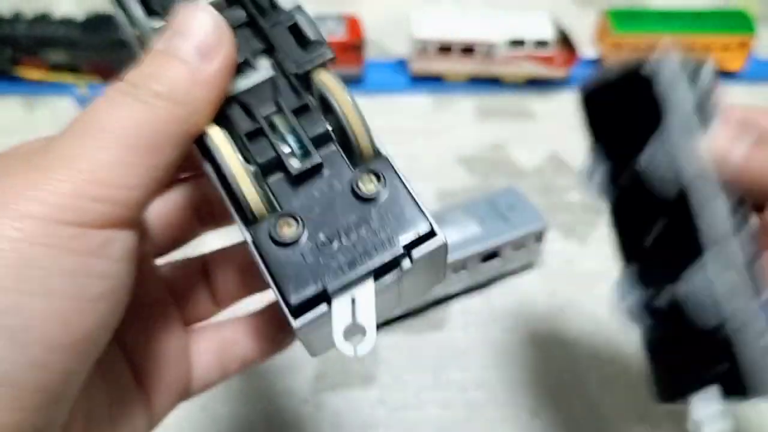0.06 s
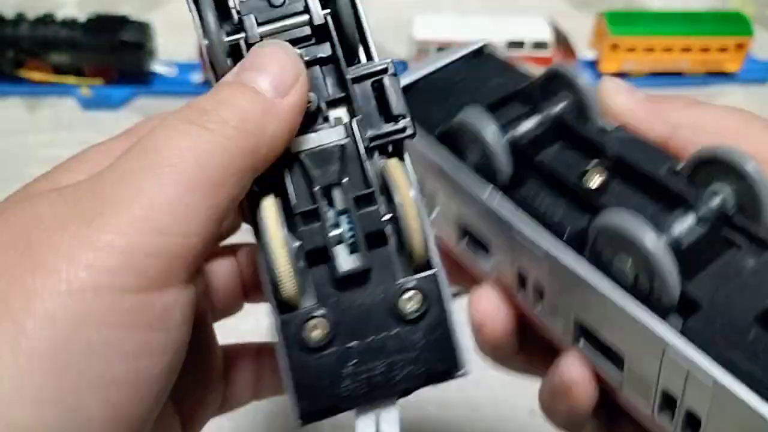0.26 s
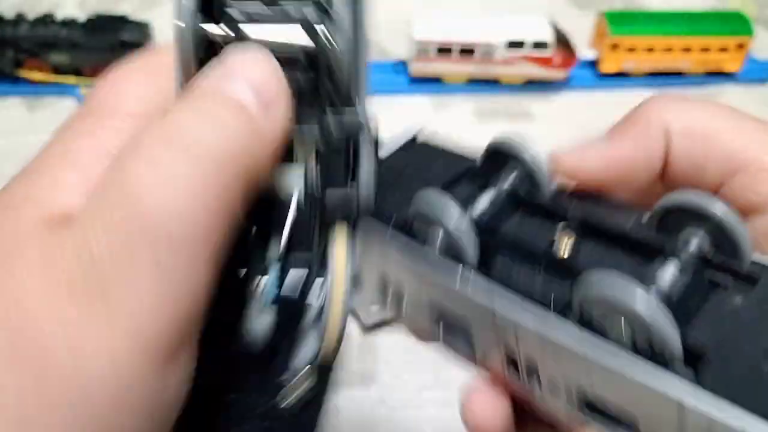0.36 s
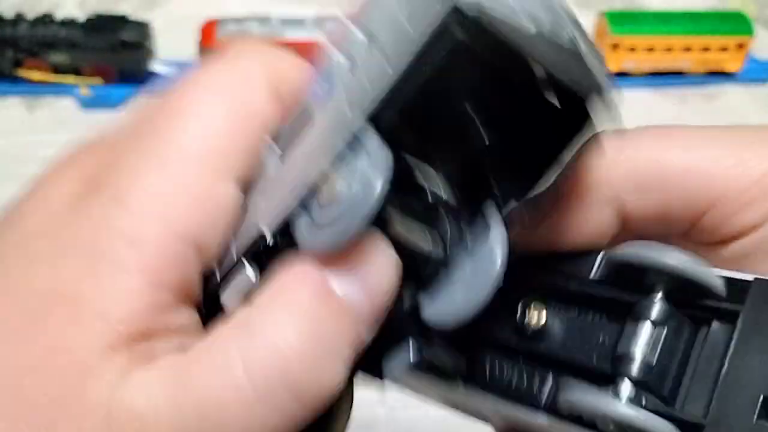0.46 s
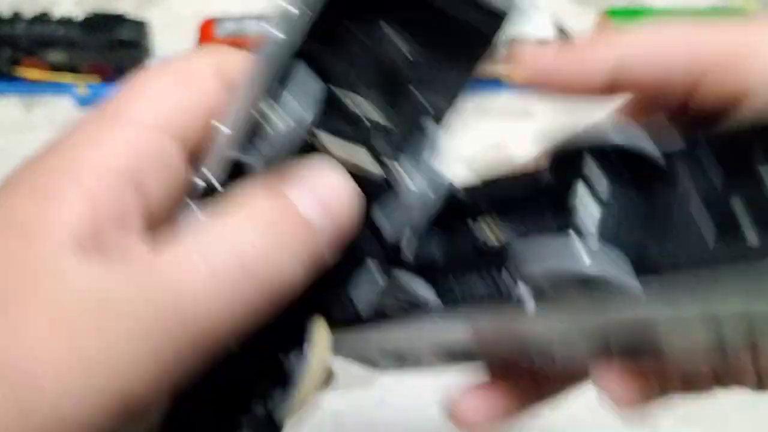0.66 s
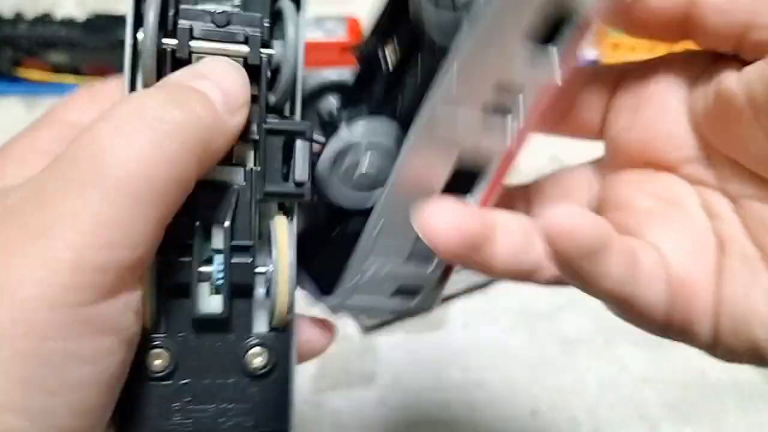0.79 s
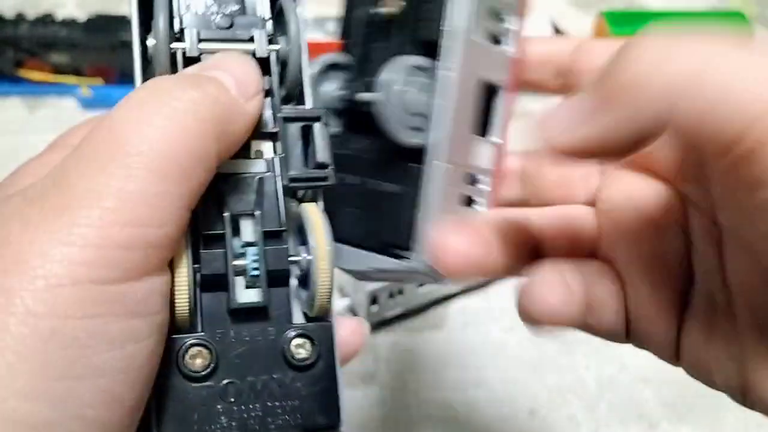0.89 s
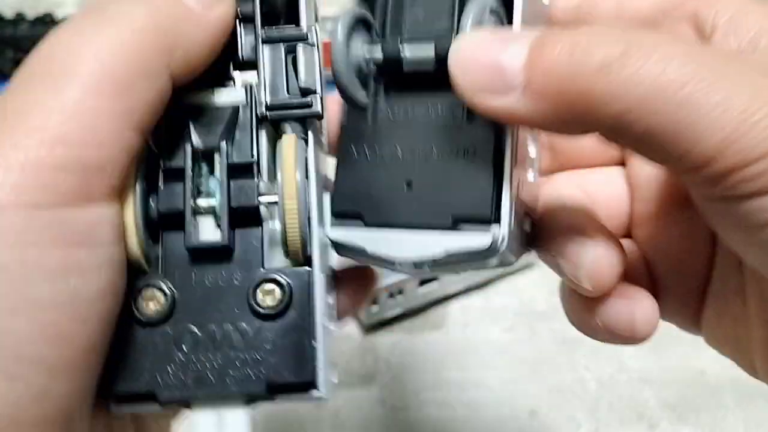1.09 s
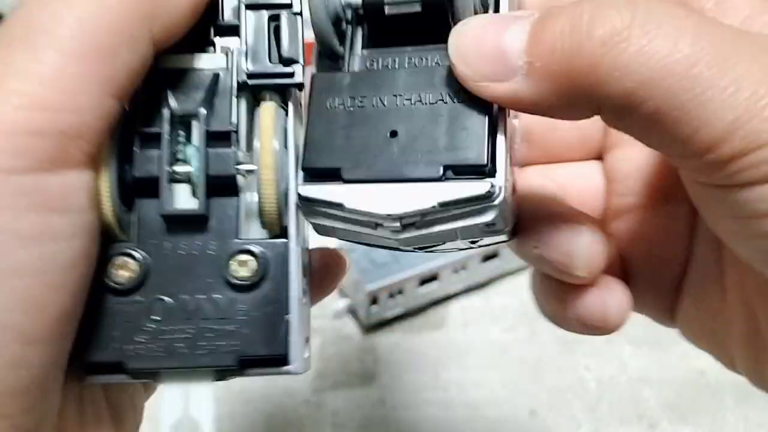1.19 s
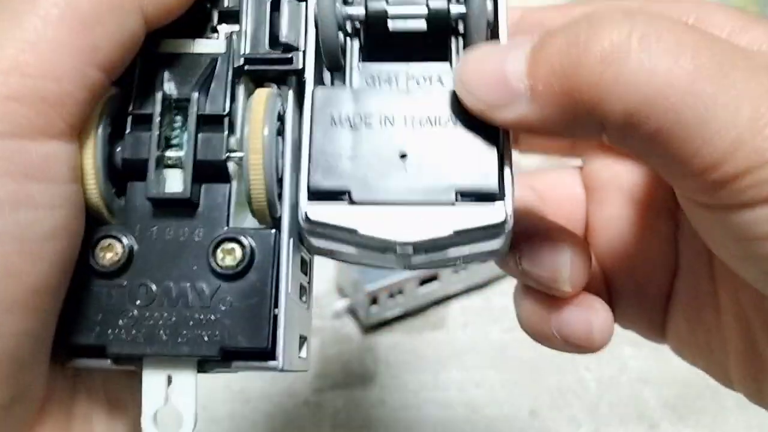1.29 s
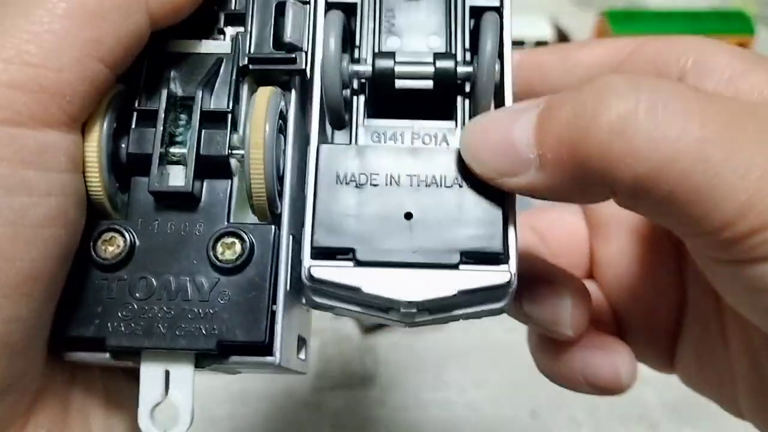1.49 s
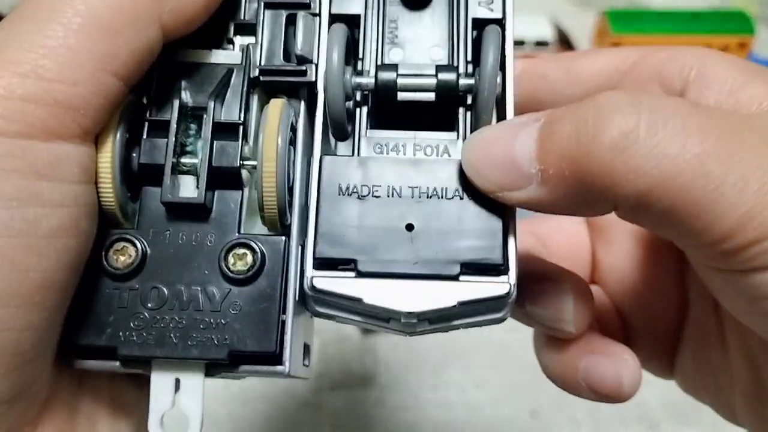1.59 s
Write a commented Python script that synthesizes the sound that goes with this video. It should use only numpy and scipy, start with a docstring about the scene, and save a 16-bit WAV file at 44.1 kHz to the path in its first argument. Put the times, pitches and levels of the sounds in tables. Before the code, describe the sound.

Close, hollow clicks and rattles of two plastic toy train cars turned in the hands.

```python
"""In a quiet room, close by, two plastic toy train cars are turned in the hands and knocked together.
Shells, loose wheels and axles click and rattle: each impact excites the normal modes of the same
hollow bodies, and the point of contact decides which are favoured. Between the clicks, friction of
fingers on plastic gives a faint rubbing. A low hum lies underneath, and all fades at the very end."""
import sys
import numpy as np
from scipy import signal
from scipy.fft import rfft, irfft
from scipy.io import wavfile

SR = 44100
rng = np.random.default_rng(int(sys.argv[2]) if len(sys.argv) > 2 else 0)


def generate_wav(signal):
    """Clip the signal to [-1, 1] and save it as 16-bit WAV at the path in sys.argv[1]."""
    frames = np.transpose(np.atleast_2d(signal))
    scaled = np.clip(frames, -1, 1) * 32767
    pcm = np.round(scaled).astype(np.int16)
    wavfile.write(sys.argv[1], SR, pcm)


N = 72765

# spectrum of the still air: f/Hz, relative spectral level/dB
AIR_SPECTRUM = [(25, -17.5), (70, -3), (130, 5), (250, -4), (500, -7.5), (1000, 0), (2500, -15),
                (6000, -20), (15000, -32.5)]
# faint low tones: peak t/s, 1/e half-width/s, f/Hz, level/dB
LOW_TONES = [(1.033, 0.029, 278, -54), (1.424, 0.025, 178, -60.5)]
# envelope of the rubbing: t/s, level/dB
RUB_ENVELOPE = [(0, -45), (.05, -50.5), (.14, -52.5), (.21, -48.5), (.28, -51), (.37, -52), (.46, -46.5),
                (.56, -49.5), (.61, -38), (.64, -54), (.70, -44), (.79, -48), (.87, -43), (.95, -50.5),
                (.99, -54.5), (1.05, -54), (1.08, -41.5), (1.12, -47.5), (1.165, -37.5), (1.19, -34),
                (1.245, -39.5), (1.285, -65), (1.33, -54.5), (1.39, -50.5), (1.45, -59), (1.48, -55),
                (1.555, -60.5), (1.61, -84)]
# spectrum of the slips: f/Hz, relative spectral level/dB
SLIP_SPECTRUM = [(200, -14.5), (500, -26.5), (800, -20), (1100, -10.5), (1400, -6), (1750, -14.5),
                 (2500, 4), (3100, -14.5), (3700, -8), (5200, -18), (7000, -19), (8000, -31), (12000, -32),
                 (15000, -42)]
# normal modes of the shells: f/Hz, level/dB, T60/s
SHELL_MODES = [(379, -37.5, 0.037), (721, -23.5, 0.05), (893, -21, 0.035), (1036, -22, .035),
               (1431, -12.5, 0.081), (1636, -10, 0.061), (1888, -4.5, 0.031), (2018, -2.5, 0.034),
               (2175, -8.5, .038), (2388, -4.5, 0.044), (2533.6, -1, 0.047), (2627, -10.5, 0.08),
               (3422, -3, 0.043), (3577, -3.5, 0.057), (3948, -5.5, 0.054), (4400, -13, 0.02),
               (4800, -12.5, 0.057), (5660, -9.5, 0.044), (6590, -14.5, 0.0325), (9100, -22.5, 0.039)]
# impacts: t/s, level/dB, hollow-body weight/dB, hardness as treble/dB,
# first and second favoured f/Hz, their emphasis/dB
IMPACTS = [(.0055, -39.5, 10.5, -22, 2370, 1024, 8), (0.0218, -43, 5.5, -25, 2620, 3470, 3),
           (.0661, -38.5, 9, -1, 4040, 2550, 1.5), (.0694, -33, -12, 3, 3660, 3870, 15.5),
           (0.1691, -34.5, 6, 4, 2300, 2570, 7), (0.18, -38.5, 7, 4, 2490, 1860, 4),
           (0.2025, -41, -6, -5, 2520, 2430, 6), (.2177, -43, 3, -10, 2530, 2200, -3),
           (0.2331, -36, 2.5, 8, 3700, 4450, 0), (0.2423, -21, -2.5, 13.5, 4250, 3880, 7.5),
           (.245, -25.5, 0, -19, 2530, 1980, 3), (0.2607, -17, 1, 10.5, 1950, 2570, 8),
           (0.2766, -28.5, -22, -20, 1970, 2530, -6), (.2899, -35, -12, -17, 2150, 2000, 7),
           (0.296, -33, -18, -15, 2560, 2000, 2), (0.3124, -26.5, -26, -7.5, 2620, 2040, 5.5),
           (0.334, -32, -5, -4.5, 1960, 2580, 10.5), (0.345, -35, -7, -5, 2050, 2500, 6),
           (0.352, -43, 2, -5, 2400, 2030, 16), (0.3896, -13.5, 8, -2, 1895, 2330, 11.5),
           (.3919, -16, 4.5, 9, 1940, 4380, 19.5), (0.4, -25, 16, 12, 2480, 1900, 16),
           (0.4097, -31.5, -27, -2, 2630, 3400, 0), (0.4729, -34, -11, 0, 4750, 1435, 15),
           (.492, -46.5, 6, 7, 2490, 3620, -9), (.5152, -13, 2, 3.5, 2640, 2544, 16.5),
           (.517, -25, 5.5, -7, 2640, 1900, -1), (0.5294, -27, 6, 7, 3600, 6700, 5.5),
           (0.5387, -42, 4, -2.5, 2600, 1435, 8.5), (.5467, -33.5, 13, 12.5, 3700, 6600, 10.5),
           (0.574, -22.5, 20.5, 11, 3370, 4600, 14.5), (0.5775, -16, -7, 6.5, 3590, 4630, 6),
           (.581, -18, 15, 0.5, 2600, 370, 15), (.5954, -31.5, -8, 6, 2450, 2520, 8),
           (0.6036, -25.5, -16, -7.5, 2535, 3620, -1), (0.6104, -33.5, -12, -6.5, 2535, 3990, -4),
           (0.6194, -35.5, 3, -17.5, 3920, 2370, 7), (0.6466, -31, -15, 8, 3770, 5490, 15.5),
           (0.6736, -35.5, 0, -6.5, 1630, 4020, 9), (0.68, -37, 12, 7, 3560, 1770, 17),
           (.7223, -31, -4, 2, 2450, 2150, 10), (.7316, -29.5, -16, 5, 2340, 3990, 6),
           (.7492, -18.5, 17, 16, 3520, 3760, 10), (.7511, -20, 4, -1, 3880, 4355, 26.5),
           (0.7662, -34.5, 15, -3, 3860, 1420, 11), (.8108, -32.5, 11, 2, 2180, 892, 14.5),
           (0.8159, -23.5, -4, 4.5, 2200, 3520, 2), (.8237, -29.5, 1, 0, 2190, 904, 24),
           (0.8538, -27, 10.5, -6.5, 2120, 2340, 13.5), (0.862, -30, 12, 8, 3870, 2450, 10),
           (0.8777, -27, 5, 3, 3550, 2320, 1.5), (0.8887, -45, -4, -1.5, 2260, 2535, 8),
           (0.9065, -30, -11, 4, 2430, 2580, 10.5), (.925, -38.5, 0, 1, 2500, 2650, 17.5),
           (0.9403, -37.5, -5, -2, 2670, 3620, 9), (0.9491, -38, 11.5, -7, 2510, 880, 3.5),
           (0.973, -51, 10, -2, 1900, 1650, 13), (1.0566, -37.5, 8, 4, 2370, 1435, -5),
           (1.0622, -25.5, 2, 2.5, 2180, 870, 12), (1.065, -22.5, 11, 23.5, 2400, 1488, 17),
           (1.0726, -33.5, -8, 4, 2540, 890, 8), (1.0797, -31.5, -16, 7.5, 2490, 2390, 8),
           (1.0999, -24, -4, -0.5, 2380, 2280, 5), (1.126, -33.5, 15, 2, 2410, 880, 2.5),
           (1.1364, -38.5, 1, 9, 2610, 2390, -2.5), (1.146, -28.5, 17, 1, 2380, 1435, 8),
           (1.1697, -24.5, 7.5, 0, 1435, 1980, 10.5), (1.1765, -23.5, 9, -1, 4770, 6500, 7),
           (1.18, -26.5, 7, -5.5, 2570, 1435, -25), (1.1911, -24.5, 2, 3, 2030, 2580, 7),
           (1.1993, -34.5, 2, 7, 2550, 3450, 6), (1.2062, -28, -4, 5, 2500, 1435, 1),
           (1.2153, -22, 7, 4, 2490, 2535, 16), (1.2266, -26.5, 5.5, -6, 2430, 1410, 8),
           (1.232, -30, -3, 7, 2450, 2535, 4.5), (1.24, -38, -7, -1, 2420, 2600, 11),
           (1.2473, -32.5, 6, -2.5, 2300, 2420, 7), (1.266, -34, 15, 4.5, 2530, 6700, 12.5),
           (1.3464, -28.5, 5, 4.5, 2520, 2390, 8.5), (1.3566, -23, 3.5, -9, 2510, 2560, 12.5),
           (1.361, -38, -4, 2.5, 1420, 6740, 14), (1.4268, -48, 4, -5, 2500, 3450, 7)]
# the crack of many overlapping short modes: f/Hz, relative spectral level/dB
CRACK_SPECTRUM = [(150, -46.5), (330, -38), (550, -45), (760, -18), (1200, -10), (1600, -11), (1900, 3),
                  (2450, 8), (3000, -9), (3700, 7.5), (4500, -6.5), (5200, -5.5), (6700, -10.5),
                  (7800, -18.5), (9500, -23), (12000, -25), (15500, -41.5)]
# decay of the crack: f/Hz, T60/s
CRACK_T60 = [(300, 0.07), (2500, 0.037), (6000, 0.038), (14000, 0.027)]
# spectrum of the reverberation: f/Hz, relative spectral level/dB
ROOM_SPECTRUM = [(200, -1.8), (1000, 0.98), (2500, 0.71), (6000, -3), (15000, -2.9)]
# reverberation time: f/Hz, T60/s
ROOM_T60 = [(200, .3), (2500, 0.11), (14000, 0.26)]
# overall gain, constant until the closing fade: t/s, gain/dB
FADE = [(1.555, -5), (1.595, -15.5), (1.65, -18)]

AIR_DB, HUM_DB, HUM_HZ = -66.5, -74, 120
SLIPS_PER_S, SLIP_SPREAD_DB, RUB_RING_DB = 2500, 3.5, -9
BODY_HZ, TREBLE_HZ, FAVOUR_OCTAVES = 1370, 5200, 0.084
CRACK_DB, MODES_DB, MODE_SCATTER_DB = 0.5, -0.5, 1.5
GRIP_DETUNE = 0.014  # the grip shifts each mode a little from one impact to the next
ATTACK_S, ONSET_WINDOW_S = 0.00053, 0.006
SNAP_DB, SNAP_S = -6.5, 0.0031  # the struck spot sounds before the ring spreads through the shell
LOW_CUT_HZ, CUTOFF_HZ = 210, 16200
ROOM_DB, ROOM_DELAY_S = -18.5, 0.0086


def from_db(db):
    """Amplitude ratio of a level in decibels."""
    return 10 ** (np.asarray(db) / 20)


def unit_rms(x, span=None):
    """Normalise to unit rms, taken over the first span samples if given."""
    return x / np.sqrt(np.mean(x[:span] ** 2) + 1e-20)


def in_time(rows):
    """Linear interpolation of a time table at every sample."""
    return np.interp(np.arange(N) / SR, *np.transpose(rows))


def at_hz(points, hz):
    """Interpolation of a table on a log-frequency axis."""
    f, value = np.transpose(points)
    return np.interp(np.log(np.maximum(hz, 1)), np.log(f), value)


def coloured(x, spectrum):
    """Filtering as multiplication of spectra; the result has unit rms."""
    gain = from_db(at_hz(spectrum, np.fft.rfftfreq(N, 1 / SR)))
    return unit_rms(irfft(rfft(x) * gain, N))


def noise_bands(size):
    """White noise resolved into quarter-octave bands: centre frequencies and signals."""
    edges = 140 * 2 ** (np.arange(29) / 4)
    white = rng.standard_normal((2, size + 2000))
    bands = [signal.sosfilt(signal.butter(2, pair, "band", fs=SR, output="sos"), white[k % 2])[-size:]
             for k, pair in enumerate(zip(edges, edges[1:]))]
    return np.sqrt(edges[1:] * edges[:-1]), np.array(bands)


def decays(level_db, t60, t):
    """Exponential damping: one envelope a row, each falling 60 dB in its T60."""
    return from_db(level_db[:, None] - 60 * t / t60[:, None])


def background():
    """Superposition of air noise, sinusoidal mains hum and two low tones with Gaussian envelopes."""
    t = np.arange(N) / SR
    air = from_db(AIR_DB) * coloured(rng.standard_normal(N), AIR_SPECTRUM)
    hum = from_db(HUM_DB) * np.sqrt(2) * np.sin(2 * np.pi * HUM_HZ * t)
    tones = sum(from_db(db) * np.exp(-((t - peak) / width) ** 2) * np.sin(2 * np.pi * hz * t)
                for peak, width, hz, db in LOW_TONES)
    return air + hum + tones


def resonator(force, hz, t60):
    """A damped harmonic oscillator: each impulse starts a decaying sinusoid."""
    r, w = from_db(-60 / (t60 * SR)), 2 * np.pi * hz / SR
    return signal.lfilter([0, np.sin(w)], [1, -2 * r * np.cos(w), r * r], force + 1e-18)


def rubbing():
    """Stick-slip friction: plastic slides under the fingers in tiny random slips that drive the shells."""
    sizes = from_db(SLIP_SPREAD_DB * np.minimum(rng.exponential(1, N), 4)) * rng.choice([-1, 1], N)
    slips = sizes * (rng.random(N) < SLIPS_PER_S / SR)
    ringing = sum((-1) ** k * from_db(db) * resonator(slips, hz, t60)
                  for k, (hz, db, t60) in enumerate(SHELL_MODES))
    friction = coloured(slips, SLIP_SPECTRUM) + from_db(RUB_RING_DB) * unit_rms(ringing)
    return from_db(in_time(RUB_ENVELOPE)) * unit_rms(friction)


def impact_gain(hz, body_db, treble_db, first_hz, second_hz, favour_db):
    """Modal coupling: a harder contact drives more treble, and the spot struck weights two resonances."""
    body = body_db / (1 + (hz / BODY_HZ) ** 6)
    treble = treble_db * np.log10(1 + (hz / TREBLE_HZ) ** 4) ** .5
    octaves_away = np.minimum(abs(np.log2(hz / first_hz)), abs(np.log2(hz / second_hz)))
    return from_db(body + treble + favour_db * np.exp(-(octaves_away / FAVOUR_OCTAVES) ** 2))


def clicks():
    """Free vibration after impact: overlapping modes merge into a crack, separate ones ring as tones."""
    size, onset = SR // 16, int(ONSET_WINDOW_S * SR)
    t, out = np.arange(size) / SR, np.zeros(N + size)
    band_hz, bands = noise_bands(size=N // 2)
    crack_decays = decays(at_hz(CRACK_SPECTRUM, band_hz), at_hz(CRACK_T60, band_hz), t)
    band_norms = np.linalg.norm(crack_decays, axis=1) * bands.std(axis=1)
    mode_hz, mode_db, t60 = np.transpose(SHELL_MODES)
    mode_decays = decays(mode_db, t60, t)
    attack = np.minimum(t / ATTACK_S, 1) * (1 + from_db(SNAP_DB) * np.exp(-t / SNAP_S))
    for time, db, *timbre in IMPACTS:
        offset = rng.integers(N // 2 - size)
        bursts = crack_decays * bands[:, offset:offset + size]
        balance = band_norms / np.linalg.norm(bursts, axis=1)  # each band gets its set share of energy
        crack = (impact_gain(band_hz, *timbre) * balance) @ bursts
        scatter, detune, phase = rng.standard_normal((3, len(SHELL_MODES), 1))
        waves = np.sin(2 * np.pi * (mode_hz[:, None] * (1 + GRIP_DETUNE * detune) * t + phase))
        modes = impact_gain(mode_hz, *timbre) @ (from_db(MODE_SCATTER_DB * scatter) * mode_decays * waves)
        click = from_db(CRACK_DB) * unit_rms(crack, onset) + from_db(MODES_DB) * unit_rms(modes, onset)
        start = int(time * SR)
        out[start:start + size] += from_db(db) * unit_rms(attack * click, onset)
    return out[:N]


def reverberation(x):
    """A small room's diffuse field: convolution with decaying noise, shortest in the low treble."""
    hz, bands = noise_bands(size=SR // 2)
    t = np.arange(SR // 2) / SR
    envelopes = decays(at_hz(ROOM_SPECTRUM, hz), at_hz(ROOM_T60, hz), t)
    tail = (bands * envelopes).sum(0) * (t > ROOM_DELAY_S)
    return from_db(ROOM_DB) * signal.fftconvolve(x, tail / np.linalg.norm(tail))[:N]


def scene():
    """Direct sound, reverberation and background add; the small shells radiate bass poorly."""
    radiation = signal.butter(2, LOW_CUT_HZ, "high", fs=SR, output="sos")
    cars = signal.sosfilt(radiation, clicks() + rubbing())
    return (cars + reverberation(cars) + background())[None]


def record(dry):
    """Attenuation and band limiting: the sound fades at the end, and a low-pass cuts the top treble."""
    low_pass = signal.ellip(10, .1, 80, CUTOFF_HZ, fs=SR, output="sos")
    return signal.sosfilt(low_pass, dry * from_db(in_time(FADE)))


dry = scene()
out = record(dry)
generate_wav(out)
```